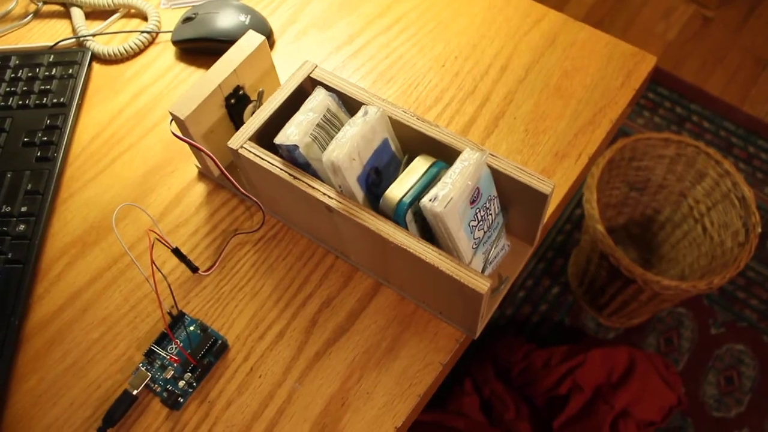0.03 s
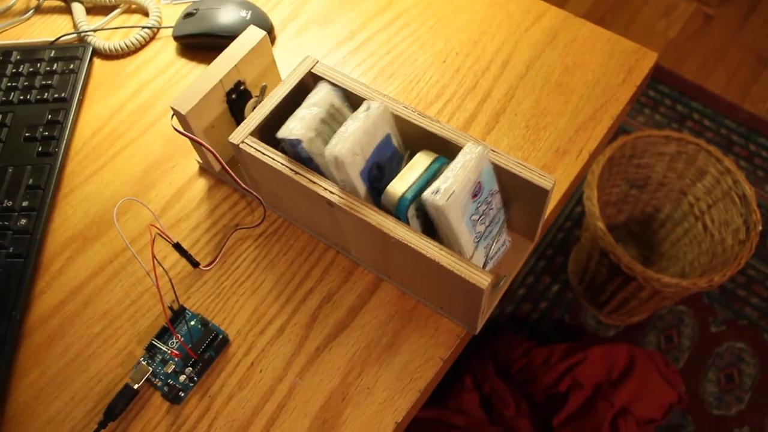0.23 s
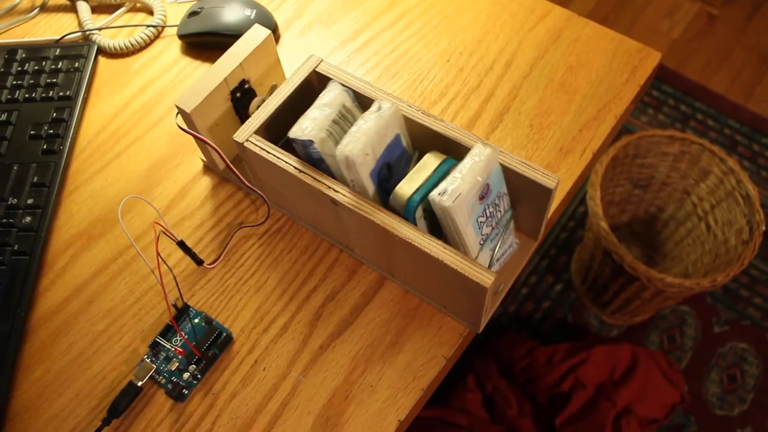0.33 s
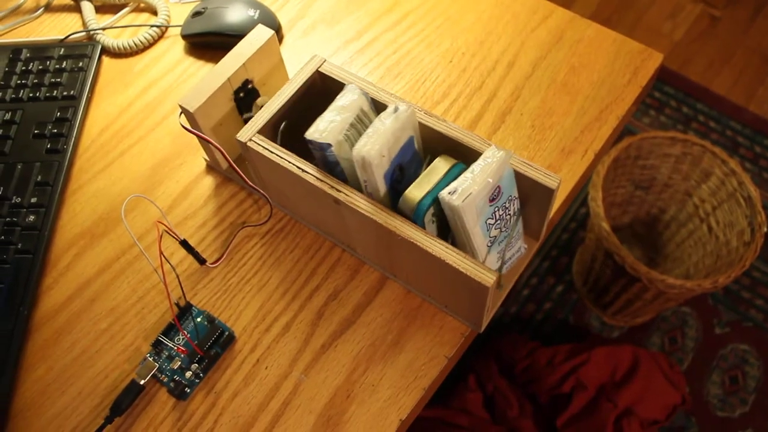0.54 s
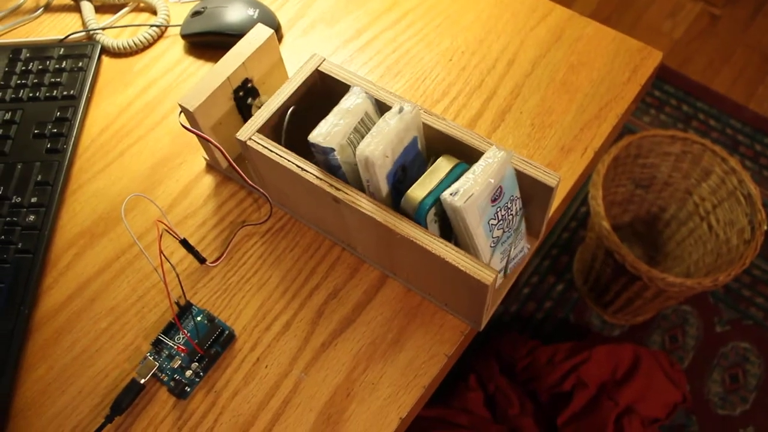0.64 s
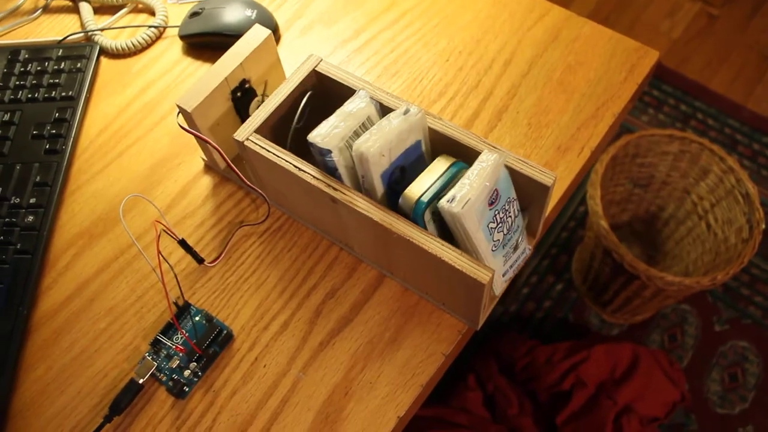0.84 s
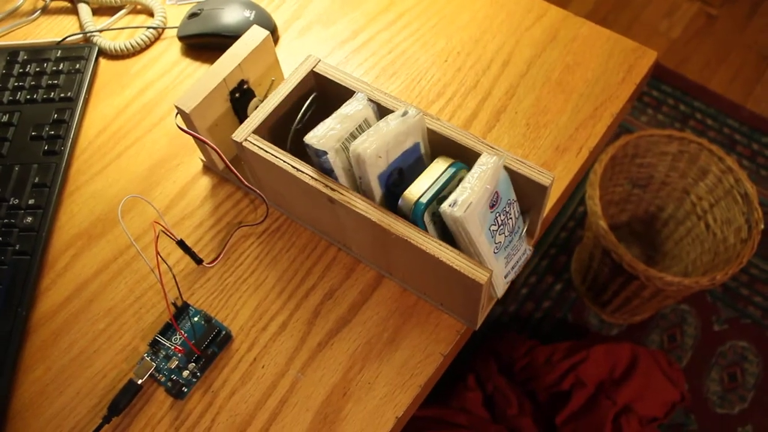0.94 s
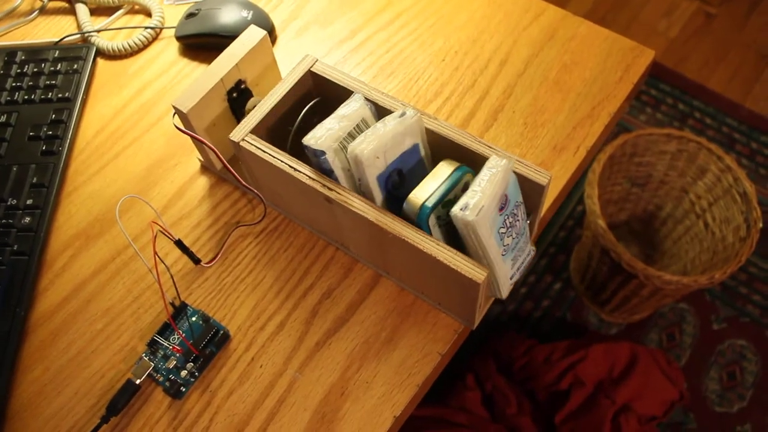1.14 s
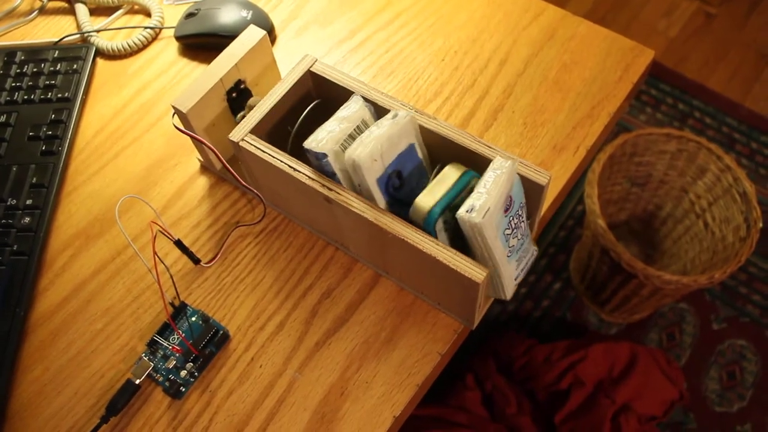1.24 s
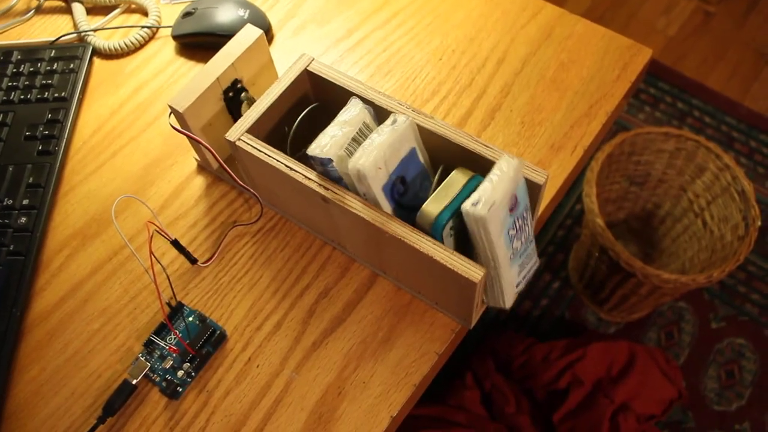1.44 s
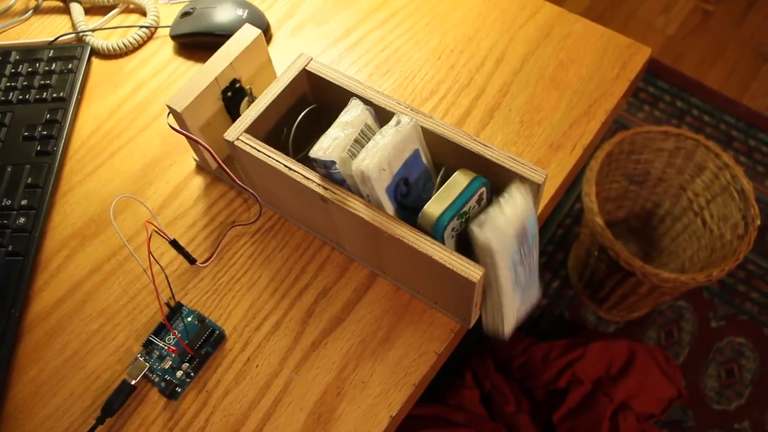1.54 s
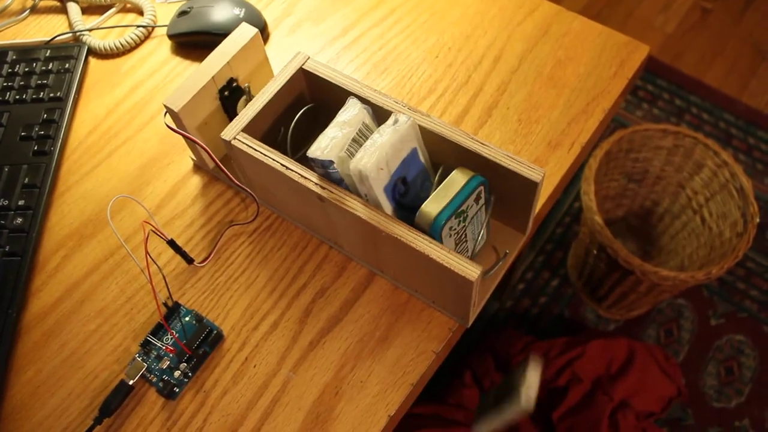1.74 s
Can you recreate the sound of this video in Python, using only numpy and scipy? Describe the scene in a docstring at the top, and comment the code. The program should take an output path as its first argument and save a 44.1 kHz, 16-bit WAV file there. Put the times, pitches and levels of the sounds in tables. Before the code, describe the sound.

A small servo motor starts after a brief quiet, its gears chattering and squealing shrilly; a gritty grind comes early as packets slide along a wooden chute, then a scrape and falling squeak end it, close in a small room.

```python
"""In a small room with mains hum, a small hobby servo starts with a tiny kick and hissing brushes.
It pushes a row of packets along a wooden dispenser: gear teeth chatter and squeal in the ringing case
over a faint whine, and the chute grinds as the load is taken up, then rubs and drones on quietly.
Late on, the front packet scrapes over the lip, the motor winds down with a falling squeak and a wrapper
rustles. Clicks and noise pass through filters and resonances; sine waves make the whine, drone and squeals."""
import sys
import numpy as np
from scipy import signal
from scipy.fft import rfft, irfft
from scipy.io import wavfile
from scipy.ndimage import uniform_filter1d

SR = 44100
rng = np.random.default_rng(int(sys.argv[2]) if len(sys.argv) > 2 else 0)


def inscribe(sig):
    """Save sig as 16-bit PCM at rate SR to the path in sys.argv[1].

    A 1-D sig is mono; a 2-D sig holds one channel per row.
    Samples are clipped to [-1, 1] before scaling.
    """
    pcm = np.round(np.clip(np.atleast_2d(sig).T, -1, 1) * 32767)
    wavfile.write(sys.argv[1], SR, pcm.astype(np.int16))


N = 79380
T = np.arange(N) / SR  # time in seconds

# How the gear teeth mesh: [t/s, tooth rate f/Hz, whine level/dB, wobble as a share of the rate]
GEAR_MESH = [(.165, 690, -85, .01), (.19, 694, -64, .015), (.56, 700, -59, .025), (.61, 705, -68, .025),
             (.66, 705, -61, .02), (.77, 705, -61, .02), (.81, 705, -69, .024), (.9, 705, -63, .023),
             (.97, 705, -61, .02), (1.02, 703, -68, .02), (1.055, 700, -57, .014),
             (1.105, 697, -55.5, .014), (1.145, 700, -66, .03), (1.18, 708, -56.5, .025),
             (1.3, 691, -56, .012), (1.39, 682, -50, .005), (1.435, 680, -51.5, .005),
             (1.465, 680, -60, .012), (1.59, 701, -62, .015), (1.615, 680, -80, .016)]
# Squeal of the teeth: [t/s, pitch f/Hz, level/dB relative to the chatter]
TOOTH_SQUEAL = [(.2, 6005, -29), (.37, 6300, -19), (.55, 6083, -14), (.7, 5997, -10.5), (1.05, 5973, -5.5),
                (1.35, 5983, -1), (1.47, 6020, -7.5), (1.58, 5880, -6.5)]


def undb(db):
    """Turn decibels into a gain."""
    return 10 ** (np.asarray(db) / 20)


def unit(x):
    """Scale a sound to an rms (average strength) of 1."""
    return x / np.sqrt(np.mean(x ** 2))


def curve(rows, axis=1):
    """Join one column of a table by straight lines in time."""
    rows = np.array(rows)
    return np.interp(T, rows[:, 0], rows[:, axis])


def envelope(rows, axis=1):
    """Turn a level curve into a gain that is silent before its first and after its last time."""
    return undb(curve(rows, axis=axis)) * (T > rows[0][0]) * (T < rows[-1][0])


def walk(rate):
    """Wander smoothly at random with spread 1, taking a new value about `rate` times a second."""
    hold = max(int(SR / rate), 2)
    steps = rng.standard_normal(N)[np.arange(N) // hold]
    return unit(uniform_filter1d(steps, hold))


def colour(x, points):
    """Filter a sound through [f/Hz, level/dB] points, never responding before its input."""
    hz, db = np.array(points).T
    size = 2048
    f = np.maximum(np.arange(size // 2 + 1) * SR / size, 1)
    log_gain = np.log(undb(np.interp(np.log(f), np.log(hz), db)))
    # Folding the cepstrum gives the minimum-phase filter with this gain
    cepstrum = irfft(log_gain)
    cepstrum[1:size // 2] *= 2
    cepstrum[size // 2 + 1:] = 0
    response = irfft(np.exp(rfft(cepstrum)))
    return signal.fftconvolve(x, response)[:N]


def ring(x, modes):
    """Drive damped resonances [f/Hz, width/Hz, level/dB]; a wider one dies away sooner."""
    t = T[:N // 10]
    response = 0
    for hz, width, db in modes:
        decay = np.exp(-np.pi * width * t)
        response = response + undb(db) * width * decay * np.cos(2 * np.pi * hz * t)
    return signal.fftconvolve(x, response)[:N]


def impacts(rate, jitter, scatter_db):
    """Make clicks at a rate in Hz, each a little early or late and of its own strength and sign."""
    at = np.flatnonzero(np.diff(np.floor(np.cumsum(rate + 0 * T) / SR)))
    late, size, sign = rng.standard_normal((N // 10, 3))[:len(at)].T
    mean_gap = N / len(at)  # in samples; jitter is a share of this
    where = np.clip(at + jitter * late * mean_gap, 0, N - 1).astype(int)
    strength = undb(scatter_db * np.clip(size, -2, 1)) * np.sign(sign)
    return unit(np.bincount(where, strength, N))


def scuff(clicks, length_s, share):
    """Let each click drag a short, fading burst of friction noise behind it."""
    power = signal.lfilter([1], [1, -np.exp(-1 / (SR * length_s))], clicks ** 2)
    friction = unit(np.sqrt(power) * rng.standard_normal(N))
    return unit(clicks + share * friction)


def background():
    """Hum of the mains and appliances as steady sine waves, with still room air as filtered noise."""
    # Hum tones: [f/Hz, rms level/dB]
    hum_tones = [(80, -83.5), (120, -59.5), (240, -84), (360, -87.5)]
    # Colour of the room air: [f/Hz, level/dB]
    air_colour = [(25, -28), (55, -47.5), (85, -6.5), (160, 4.5), (320, 8.5), (500, 2.5), (1000, -5.5),
                  (3000, -14), (6500, -14.5), (10000, -19.5), (15500, -22)]
    air_db = -71.5
    hum = 0
    for hz, db in hum_tones:
        hum = hum + np.sqrt(2) * undb(db) * np.sin(2 * np.pi * (hz * T + rng.random()))
    air = unit(colour(rng.standard_normal(N), air_colour))
    return hum + undb(air_db) * air


def rustle():
    """The freed wrapper rustles briefly as crinkle clicks pass twice through its resonances."""
    # Rustle over time: [t/s, level/dB]
    rustle_level = [(1.5, -62), (1.57, -50.5), (1.62, -71), (1.66, -69.5), (1.72, -80)]
    # Resonances of the wrapper: [f/Hz, width/Hz, level/dB]
    foil_modes = [(5370, 570, 8), (5970, 400, 0.5)]
    crinkles = impacts(2500, jitter=.5, scatter_db=2)
    return unit(ring(ring(crinkles, foil_modes), foil_modes)) * envelope(rustle_level)


def winding_down(wobble=0.0266):
    """A short, unsteady tone falls in pitch as the servo motor winds down."""
    # Falling squeak: [t/s, pitch f/Hz, level/dB]
    falling_squeak = [(1.462, 2000, -68), (1.478, 1880, -56), (1.492, 1520, -57), (1.506, 1180, -53),
                      (1.525, 1100, -66)]
    hz = curve(falling_squeak) * (1 + wobble * walk(400))
    return np.sin(2 * np.pi * np.cumsum(hz) / SR) * envelope(falling_squeak, axis=2)


def creak():
    """Quick, irregular slips ring the push rod, most strongly under load."""
    # Creak over time: [t/s, level/dB]
    creak_level = [(.29, -66), (.325, -44.5), (.357, -39.5), (.385, -63), (.435, -47), (.46, -75),
                   (.6, -59), (.68, -55), (.95, -68), (1.08, -52.5), (1.15, -60), (1.45, -56)]
    # Resonances of the push rod: [f/Hz, width/Hz, level/dB]
    rod_modes = [(3450, 110, 0), (3580, 110, -1.5), (3900, 140, -8)]
    slips = impacts(700, jitter=.5, scatter_db=3)
    return unit(ring(slips, rod_modes)) * envelope(creak_level)


def drone(rough_db=4):
    """Once the load is moving, the wood drones around the mesh rate with a widely wavering pitch."""
    # Drone over time: [t/s, level/dB]
    drone_level = [(.6, -60), (.69, -65), (.745, -55), (.85, -60), (.99, -70), (1.07, -58), (1.17, -64.5),
                   (1.25, -60), (1.32, -65.5), (1.39, -88)]
    wobble_share, wobble_hz = .11, 190
    hz = curve(GEAR_MESH) * (1 + wobble_share * np.tanh(walk(wobble_hz)))
    tone = np.sin(2 * np.pi * np.cumsum(hz) / SR)
    roughness = undb(rough_db * np.tanh(walk(110)))
    return unit(tone * roughness) * envelope(drone_level)


def whine(rough_db=3.5):
    """The turning gears whine in several unsteady tones that follow the tooth rate in fixed ratios."""
    # Whine tones: [ratio to the tooth rate, level/dB]
    whine_tones = [(1.44, -11), (2, 5.5), (2.86, 1.5), (5.1, -3)]
    hz = curve(GEAR_MESH) * (1 + curve(GEAR_MESH, axis=3) * walk(120))
    phase = 2 * np.pi * np.cumsum(hz) / SR
    tones = 0
    for ratio, db in whine_tones:
        tones = tones + undb(db + rough_db * np.tanh(walk(160))) * np.sin(ratio * phase)
    return unit(tones) * envelope(GEAR_MESH, axis=2)


def tipping():
    """The front packet's wrapper scrapes over the lip of the chute in many small slips."""
    # Scrape over time: [t/s, level/dB]
    scrape_level = [(1.2, -47.5), (1.33, -46), (1.385, -43.5), (1.43, -44), (1.47, -46), (1.495, -41.5),
                    (1.52, -52), (1.58, -53), (1.63, -96)]
    # Colour of the scrape: [f/Hz, level/dB]
    wrapper_colour = [(300, -31), (2500, -7), (4000, -4), (4700, 5), (5500, 3.5), (6500, 7), (7500, -9),
                      (10000, -34), (15000, -32)]
    slips = scuff(impacts(700, jitter=0.32, scatter_db=2), length_s=0.0013, share=1.2)
    return unit(colour(slips, wrapper_colour)) * envelope(scrape_level)


def brushes():
    """The motor starts with a kick; its sparking brushes hiss until it coasts to rest."""
    # Colour of the brush hiss: [f/Hz, level/dB]
    brush_colour = [(800, -44), (3500, -18), (4600, -9.5), (5400, -4.5), (6000, 3), (7500, -1.5),
                    (9500, -2.5), (11000, -2.5), (12000, -10), (15500, -21)]
    on_s, off_s, coast_s = .1545, 1.476, 0.035
    start_share, spin_up_s = .6, .03
    brush_db, kick_db, kick_s = -52, -66, 0.00084
    running = undb(brush_db) * np.exp(-np.maximum(T - off_s, 0) / coast_s)
    running = running * np.clip(start_share + (1 - start_share) * (T - on_s) / spin_up_s, 0, 1)
    kick = undb(kick_db) * np.exp(-np.abs(T - on_s) / kick_s)
    sparks = scuff(impacts(1400, jitter=0.17, scatter_db=9.5), length_s=.0005, share=0.27)
    return unit(colour(sparks, brush_colour)) * (running + kick) * (T > on_s)


def packets():
    """Packets rub along the resonant chute and knock at its end; a faint wavering tone rings on."""
    # Rubbing over time: [t/s, level/dB]
    rub_level = [(.16, -76), (.21, -67), (.232, -46.5), (.26, -49), (.3, -53), (.5, -44.5), (.62, -53),
                 (.74, -53.5), (.9, -51.5), (1.1, -53), (1.27, -50.5), (1.45, -55.5), (1.495, -47),
                 (1.52, -55), (1.58, -58), (1.63, -74)]
    # Colour of the wooden chute: [f/Hz, level/dB]
    chute_colour = [(50, -23), (130, -12), (200, -1), (280, -0.5), (420, -2), (700, 4), (1100, 0),
                    (2000, -1.5), (3500, -3.5), (6000, -12.5), (15000, -14.5)]
    # Resonances of the chute walls: [f/Hz, width/Hz, level/dB]
    wall_modes = [(424, 9.7, 2), (598, 48, -2.5), (715, 25, -7), (978, 15, -17), (1400, 92, 3.5),
                  (1702, 84, 1.5), (1960, 14, 5.5), (2164, 32, 0.5), (2835, 54, -3), (3420, 103, 0),
                  (3820, 56, -6)]
    # Knocks against the chute: [t/s, level/dB]
    knock_times = [(.366, -41), (1.372, -36), (1.398, -41), (1.488, -42.5), (1.497, -44)]
    # Colour of a knock: [f/Hz, level/dB]
    knock_colour = [(50, -40), (200, -6), (700, -5), (1400, 0), (2500, -4), (4000, 0), (6000, -5),
                    (14000, -24)]
    chute_db, walls_db, knock_s = -3.5, -7.5, .0018
    ring_at_s, ring_hz, ring_t60_s, ring_db, ring_wobble = 1.51, 680, .62, -55.5, .01

    slips = scuff(impacts(430, jitter=.6, scatter_db=2.0), length_s=0.0052, share=1.3)
    wood = undb(chute_db) * unit(colour(slips, chute_colour))
    walls = undb(walls_db) * unit(ring(slips, wall_modes))
    rub = (wood + walls) * envelope(rub_level)

    blows = 0
    for start_s, db in knock_times:
        blows = blows + undb(db) * (T >= start_s) * np.exp(-np.abs(T - start_s) / knock_s)
    knocks = blows * unit(colour(rng.standard_normal(N), knock_colour))

    age = np.maximum(T - ring_at_s, 0)
    fade = (T > ring_at_s) * np.exp(-np.log(1000) * age / ring_t60_s)  # 60 dB down after T60
    hz = ring_hz * (1 + ring_wobble * walk(150))
    tone = undb(ring_db) * fade * np.sin(2 * np.pi * np.cumsum(hz) / SR)
    return rub + knocks + tone


def grinding(frame_db=-2, broad_db=-5):
    """As the load is taken up, surfaces stick and slip and shake the frame in a gritty shudder."""
    # Grinding over time: [t/s, level/dB]
    strain_level = [(.27, -56.5), (.315, -44), (.345, -38.5), (.368, -34), (.385, -38.5), (.435, -38.5),
                    (.455, -43.5), (.52, -68), (.62, -81)]
    # Resonances of the loaded frame: [f/Hz, width/Hz, level/dB]
    frame_modes = [(458, 380, -6.5), (778, 46, -2), (1092, 100, 0.5), (1350, 170, -3), (1710, 62, -4.5),
                   (1970, 190, -4.5), (2670, 72, -2), (2780, 100, 1), (3384, 78, 10.5), (6460, 190, 6.5),
                   (6820, 180, 8.5), (7390, 140, -2.5)]
    # Broad colour of the grinding: [f/Hz, level/dB]
    grind_colour = [(40, -58), (100, -69), (200, -4.5), (400, 5.5), (1400, 5), (3500, 3.5), (5000, -20),
                    (7000, -2.5), (10500, -4), (12000, -16), (15500, -25.5)]
    shudder_hz, shudder_db = 260, 2.2
    slips = scuff(impacts(600, jitter=0.27, scatter_db=1.0), length_s=0.00035, share=0.91)
    slips = slips * undb(shudder_db * np.tanh(walk(shudder_hz)))
    frame = undb(frame_db) * unit(ring(slips, frame_modes))
    grit = undb(broad_db) * unit(colour(slips, grind_colour))
    return (frame + grit) * envelope(strain_level)


def overtone(wobble_hz=110, chatter_db=4):
    """A second, thinner squeal of the case comes and goes above the first."""
    # Higher squeal over time: [t/s, level/dB]
    overtone_level = [(.2, -62), (.4, -62), (.47, -46), (.525, -43), (.61, -52), (.68, -50), (.8, -48.5),
                      (.95, -54), (1.08, -50.5), (1.22, -55), (1.29, -49), (1.46, -49), (1.5, -63)]
    hz = 7940 + wobble_hz * walk(600)
    tone = np.sin(2 * np.pi * np.cumsum(hz) / SR)
    chatter = undb(chatter_db * np.tanh(walk(400)))
    return unit(tone * chatter) * envelope(overtone_level)


def squeal(wobble_hz=110, chatter_db=4):
    """Dry teeth set the case's main resonance singing in quick, uneven spurts, higher under load."""
    hz = curve(TOOTH_SQUEAL) + wobble_hz * walk(450)
    tone = np.sin(2 * np.pi * np.cumsum(hz) / SR)
    chatter = undb(chatter_db * np.tanh(walk(550)))
    return unit(tone * chatter)


def gears(catch_rattle=0.031):
    """Tooth impacts ring the case, flutter with the backlash and now and then catch and squeak."""
    # Gear chatter over time: [t/s, level/dB]
    drive_level = [(.153, -70), (.156, -56), (.205, -45.5), (.215, -37.5), (.3, -36), (.37, -34),
                   (.48, -34.5), (.495, -40), (.52, -32.5), (.56, -42), (.585, -31.5), (.61, -44),
                   (.635, -35), (.8, -37), (1.03, -36), (1.1, -35.5), (1.115, -39), (1.19, -38),
                   (1.33, -36.5), (1.47, -37.5), (1.505, -52.5), (1.53, -38.5), (1.575, -57.5), (1.62, -94)]
    # Teeth that catch and squeak: [t/s, level/dB]
    catch_times = [(.396, -33), (.52, -35), (.535, -39), (.636, -39), (.693, -37), (.724, -37), (.801, -31),
                   (.822, -37), (.872, -33), (.877, -32), (.892, -38), (.925, -31), (.971, -38), (1.0, -34),
                   (1.016, -39), (1.037, -33), (1.049, -38), (1.073, -36), (1.098, -33), (1.13, -37),
                   (1.164, -39), (1.24, -35), (1.293, -32), (1.339, -36), (1.367, -36), (1.439, -35),
                   (1.465, -37)]
    # Resonances of the servo case: [f/Hz, width/Hz, level/dB]
    case_modes = [(5977, 103, 7.5), (6302, 220, 3), (9080, 140, -35)]
    # Broad colour of a tooth click: [f/Hz, level/dB]
    click_colour = [(300, -26), (2000, -22), (3000, -17.5), (3700, -4), (5200, -0.5), (6000, 5),
                    (7400, 8.5), (8150, 7.5), (8600, -4), (9500, 4), (10100, -34), (11000, -9.5),
                    (11800, -31.5), (15500, -24.5)]
    case_db, click_db, catch_s = -6.5, -9, .0032
    flutter_hz, flutter_db = 71, 1

    # jitter is a share of the gap between teeth
    clatter = impacts(curve(GEAR_MESH), jitter=.2, scatter_db=-0.5)
    teeth = scuff(clatter, length_s=0.00055, share=0.81)
    flutter = unit(undb(flutter_db * np.clip(walk(flutter_hz), -2, 1)))
    drive = envelope(drive_level) * flutter
    catches = 0
    for middle_s, db in catch_times:
        catches = catches + undb(db) * np.exp(-((T - middle_s) / catch_s) ** 2)
    force = teeth * (drive + catch_rattle * catches)

    # Dividing by the steady teeth's strength keeps the rise and fall of the force
    case = ring(force, case_modes) / np.std(ring(teeth, case_modes))
    clicks = colour(force, click_colour) / np.std(colour(teeth, click_colour))
    singing = squeal() * (undb(curve(TOOTH_SQUEAL, axis=2)) * drive + catches / 2)
    return undb(case_db) * case + undb(click_db) * clicks + singing


def room(x):
    """Add the diffuse reflections of a small furnished room, duller than the direct sound."""
    t60_s, room_db, top_hz = 0.3, -6.5, 6440
    tail = rng.standard_normal(N) * np.exp(-np.log(1000) * T / t60_s) * (T > .003)
    tail = tail / np.sqrt(np.sum(tail ** 2))
    dulling = signal.butter(2, min(top_hz, SR / 2 - 1), fs=SR, output="sos")
    tail = signal.sosfilt(dulling, tail)
    return x + undb(room_db) * signal.fftconvolve(x, tail)[:N]


def scene():
    """The dispenser at work in the room; its small parts radiate no deep bass."""
    load = rustle() + creak() + drone() + tipping() + packets() + grinding()
    servo = winding_down() + whine() + brushes() + overtone() + gears()
    bass_cut = signal.butter(4, 85, "high", fs=SR, output="sos")  # Hz
    machine = signal.sosfilt(bass_cut, load + servo)
    return (room(machine) + background())[None]


def record(dry):
    """The microphone dulls the highest treble and the recorder cuts the top."""
    # Microphone colour: [f/Hz, level/dB]
    mic_colour = [(1000, -1), (5000, -0.5), (5300, -2.5), (5800, -.5), (7500, -2), (8100, -1), (8600, -2.5),
                  (9500, 0), (10100, -0.5), (10600, 0), (11100, -.5), (11800, -6.5), (12400, -2.5),
                  (15500, -5.5)]
    heard = colour(dry[0], mic_colour)[None]
    top_cut = signal.ellip(12, .1, 80, 15720, fs=SR, output="sos")  # ripple dB, depth dB, edge Hz
    return signal.sosfilt(top_cut, heard)


dry = scene()
out = record(dry)
inscribe(out)
```